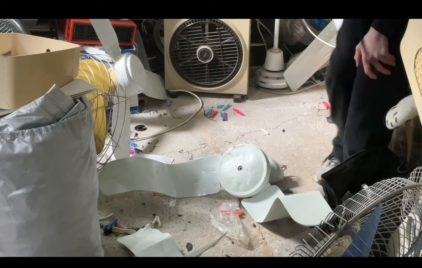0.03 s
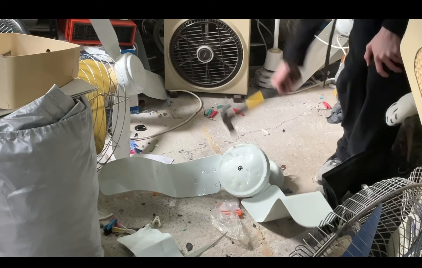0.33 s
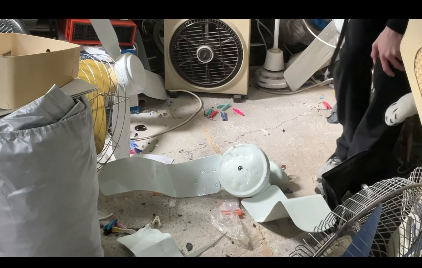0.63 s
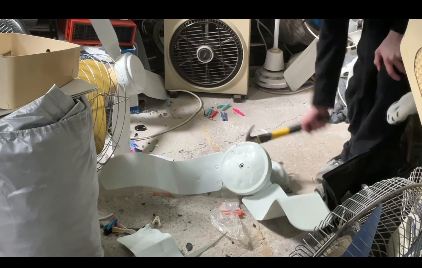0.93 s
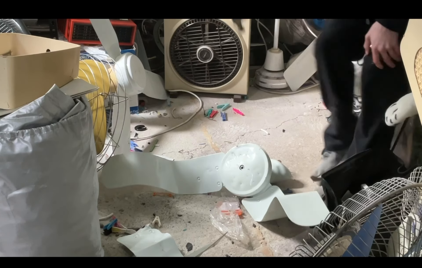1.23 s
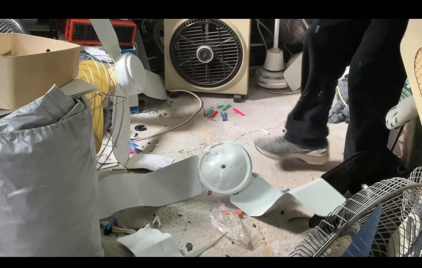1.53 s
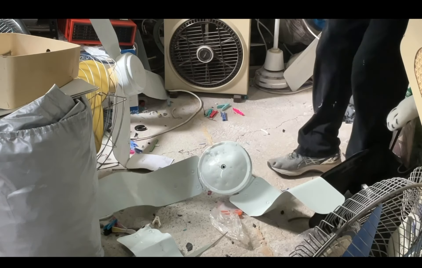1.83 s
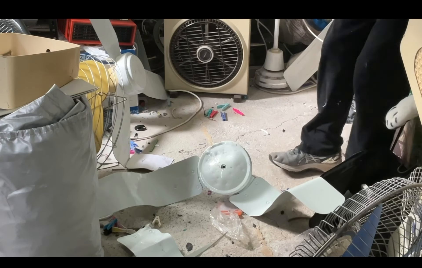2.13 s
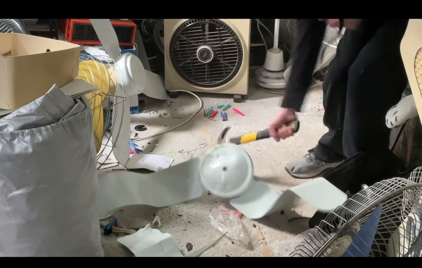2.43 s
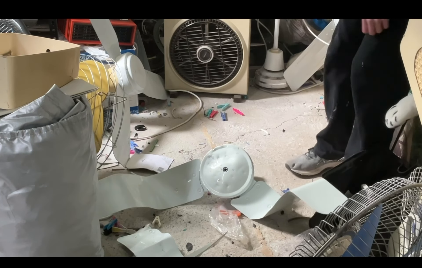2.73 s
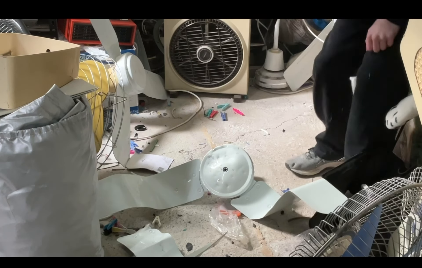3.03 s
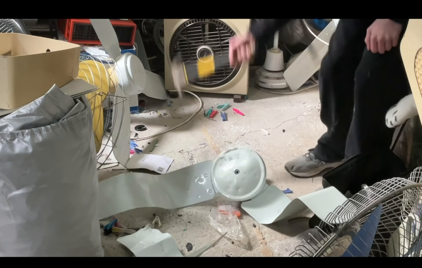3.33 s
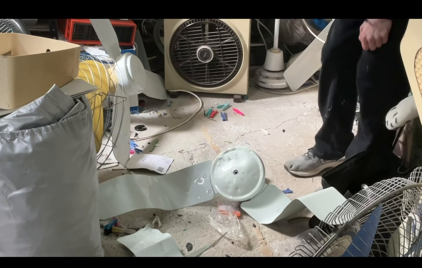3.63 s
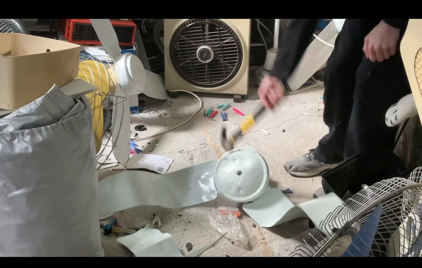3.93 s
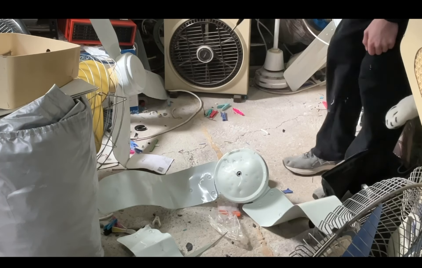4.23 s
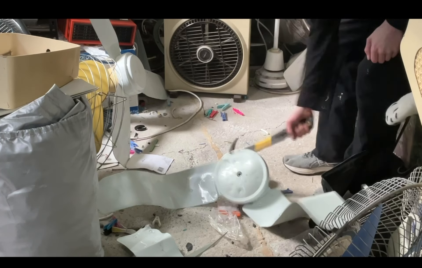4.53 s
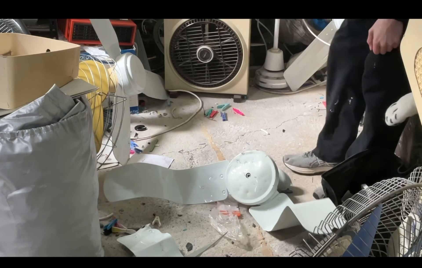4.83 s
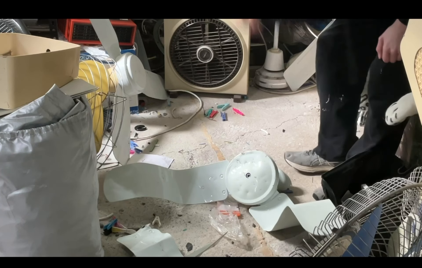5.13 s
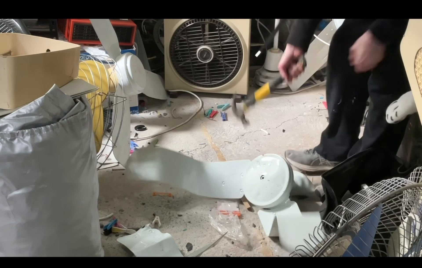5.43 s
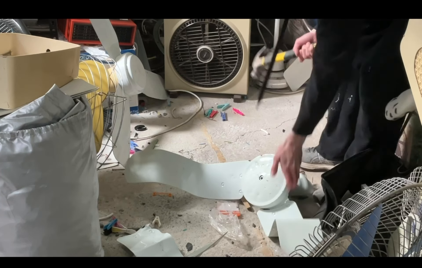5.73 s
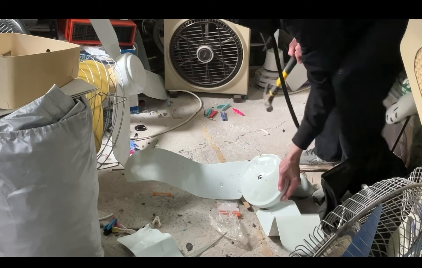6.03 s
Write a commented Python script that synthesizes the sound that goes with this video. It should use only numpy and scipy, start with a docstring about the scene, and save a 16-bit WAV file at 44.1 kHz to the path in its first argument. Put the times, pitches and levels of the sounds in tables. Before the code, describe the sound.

A hammer smashes a ceiling fan's metal housing on a concrete floor, close by in a small shed. Loud blows land at about 0.2 and 0.9 seconds, each a sharp crack with a brief, crumpled metallic clang and short, hard echoes. At 1.4 seconds a shoe kicks the fan, lighter and brighter, and it skids in a quick run of knocks before dropping with a dull clunk at 1.6. Five more blows follow at 2.4, 3.2, 3.9, 4.6 and 5.2 seconds, each slightly different in pitch. The fan hops and clatters on the floor after most of them, hardest just after 4.6. A loose steel part tinks, most clearly at 0.3 and 3.5 seconds. Small dry ticks and faint gritty shoe scuffs fall between the hits. A very faint low hum throbs throughout, and around 6 seconds the fan gives a soft, brief scrape.

```python
"""Smashing a fan in a shed

A claw hammer smashes a ceiling fan that lies on the concrete floor of a small cluttered shed.
Each blow cracks, rings the motor housing and shakes loose parts; the fan is kicked once, skids and
rocks back. A loose steel part tinks, shoes scuff the grit, and a low hum throbs under short,
hard echoes."""
import sys
import numpy as np
from scipy import signal
from scipy.fft import rfft, irfft, next_fast_len
from scipy.io import wavfile

SR = 44100
rng = np.random.default_rng(int(sys.argv[2]) if len(sys.argv) > 2 else 0)


def dump(signal):
    """Clip the signal to [-1, 1] and save it as 16-bit WAV at the path in sys.argv[1]."""
    limited = np.clip(np.atleast_2d(signal).T, -1, 1)
    pcm = np.round(limited * 32767).astype(np.int16)
    wavfile.write(sys.argv[1], SR, pcm)


N = 268701
SIZE = 32768  # samples in a one-shot
T, HZ = np.arange(SIZE) / SR, np.arange(SIZE // 2 + 1) * SR / SIZE
MIDDLE_S = T[SIZE // 2]


def amp(db):
    """Decibels to gain."""
    return 10 ** (np.asarray(db) / 20)


def curve(points, hz):
    """Read breakpoints of (frequency, value) on a log-frequency axis."""
    freqs, values = np.transpose(points)
    return np.interp(np.log(hz + 1e-3), np.log(freqs), values)


def unit(x):
    """Scale to energy 1."""
    return x / np.sqrt(np.sum(x ** 2))


def eq(x, db):
    """Minimum-phase EQ with the given dB at each frequency: no ring ahead of the attack."""
    cepstrum = irfft(db * np.log(10) / 20)
    cepstrum[1:SIZE // 2] *= 2
    cepstrum[SIZE // 2 + 1:] = 0
    return irfft(rfft(x) * np.exp(rfft(cepstrum)))


def add(track, s, x):
    """Mix x into the track at time s."""
    start = int(s * SR)
    x = x[max(-start, 0):max(len(track) - start, 0)]
    start = max(start, 0)
    track[start:start + len(x)] += x


# air noise: (frequency [Hz], relative level [dB])
AIR_SPECTRUM = [(20, -27.5), (45, 0), (65, 4.5), (100, -16), (140, -14), (280, -13.5), (600, -22),
                (2000, -28), (5000, -33.5), (9000, -41.5), (15000, -52.5)]
# hum tones: (frequency [Hz], rms level before the swell [dB])
HUM_TONES = [(59.2, -65.5), (77.5, -69.5), (143, -79.5)]
# the hum's swell: (time [s], gain [dB])
HUM_FADER = [(0, -2), (.7, 1.5), (2, -2.5), (3.1, -1.5), (3.8, 2), (4.5, 6), (5.1, 0.5), (6, 0)]

def room_tone():
    """The bed: low tones waver and beat against each other over faint air noise."""
    t = np.arange(N) / SR
    air = irfft(rfft(rng.standard_normal(N)) * amp(curve(AIR_SPECTRUM, np.fft.rfftfreq(N, 1 / SR))), N)
    hum = 0
    for hz, db in HUM_TONES:
        drift = np.interp(t, np.linspace(0, t[-1], 40), np.cumsum(rng.standard_normal(40)))
        hum += amp(db) * np.sqrt(2) * np.sin(2 * np.pi * hz * t + .33 * drift)
    swell = amp(np.interp(t, *np.transpose(HUM_FADER)))
    return amp(-65) * unit(air) * np.sqrt(N) + hum * swell


# tone of a hard contact on metal or concrete: (frequency [Hz], level [dB])
CONTACT_SPECTRUM = [(35, -24.5), (70, -6), (120, -7), (180, -1), (300, 1), (650, 8), (1200, 5.5), (1700, 3),
                    (2500, 5), (4200, -0.5), (7000, -3), (10000, -8.5), (15500, -14)]

def contact_tone(bass_db, treble_db):
    """The contact's EQ curve in dB, with a low and a high shelf."""
    low_shelf = bass_db * curve([(130, 1), (400, 0)], HZ)
    high_shelf = treble_db * curve([(1300, 0), (4000, 1)], HZ)
    return curve(CONTACT_SPECTRUM, HZ) + low_shelf + high_shelf


def grains(envelope, per_s, scatter_db):
    """Many tiny contacts of uneven size."""
    sizes = amp(scatter_db * np.minimum(rng.exponential(size=SIZE), 4)) * rng.choice([-1, 1], SIZE)
    touches = rng.random(SIZE) < per_s / SR
    return unit(envelope * sizes * touches + 1e-12)


def crunch(rise_s, fall_s, bass_db, treble_db):
    """A grainy burst, swelling to a peak at MIDDLE_S and dying away."""
    t = T - MIDDLE_S
    envelope = np.exp(np.minimum(t / rise_s, -t / fall_s))
    burst = grains(envelope, per_s=5000, scatter_db=1.2)
    return eq(burst, contact_tone(bass_db, treble_db)) * np.sqrt(np.sum(envelope ** 2))


# shoe scuffs: (peak time [s], level [dB], fall [s])
SCUFF_CUES = [(0, -49, .046), (.788, -60.5, .06), (1.142, -63, .2), (1.851, -61, .09), (2.259, -57, .047),
              (2.759, -58.5, .12), (4.32, -59, .025)]

def shoes():
    """Soles shuffle on the grit between blows."""
    out = np.zeros(N)
    for s, db, fall_s in SCUFF_CUES:
        add(out, s - MIDDLE_S, amp(db) * crunch(rise_s=.035, fall_s=fall_s, bass_db=6, treble_db=-2.5))
    return out


# reverb time: (frequency [Hz], t60 [s])
SHED_DECAY = [(100, 0.56), (300, 0.37), (700, 0.24), (1500, 0.58), (4000, 0.17), (8000, 0.47),
              (15000, 0.29)]
# reverb width: (frequency [Hz], side share of the power [0-1])
SHED_WIDTH = [(150, .01), (300, .12), (550, .45), (1200, .3), (1900, .08), (2550, .02), (4100, .01),
              (7000, .07), (9800, .01), (13000, .05)]

def shed(x):
    """Stereo reverb: near walls slap back after a short gap, then the echoes fade."""
    centres = np.geomspace(60, 16000, 7)
    noise = rfft(rng.standard_normal((2, SIZE)))
    tail = 0
    for centre, weights in zip(centres, np.eye(len(centres))):
        band = irfft(noise * curve(np.c_[centres, weights], HZ))
        tail += band * amp(-60 * T / curve(SHED_DECAY, centre))
    build_up = .25 + .75 / (1 + np.exp((.0125 - T) / .002))
    near_walls = 1 + 1.8 * np.exp(-T / .01)
    tail = unit(tail * build_up * near_walls) * np.sqrt(2)
    width = np.clip(curve(SHED_WIDTH, HZ), 0, .5)
    mid, side = irfft(rfft(tail) * np.sqrt([1 - width, width])) * (T < T[-1] * .9)
    return signal.fftconvolve(x[None], np.array([mid + side, mid - side]), axes=1)[:, :len(x)]


def crack(spread_s):
    """The transient: bending waves leave the sheet at a different moment in every band."""
    delay = np.interp(HZ, np.linspace(0, SR / 2, 160), spread_s * rng.random(160))
    return irfft(np.exp(-2j * np.pi * np.cumsum(delay) * HZ[1])) * (T < 2 * spread_s)


def ring(modes, push):
    """Damped modes driven by a push; each contact point weights and detunes them a little."""
    hz, db, t60 = np.transpose(modes)[:, :, None]
    weight, detune, phase = rng.standard_normal((3, len(hz), 1))
    waves = np.sin(2 * np.pi * (hz * (1 + .0018 * detune) * T + phase)) * amp(-60 * T / t60)
    response = sum(gain * unit(wave) for gain, wave in zip(amp(db + 2.2 * weight), waves))
    return signal.fftconvolve(push, response)[:SIZE]


# modes of the motor housing and blades: (frequency [Hz], level [dB], t60 [s])
HOUSING_MODES = [(118, -10.5, 0.17), (293.8, -8, .5), (392.6, -9.5, 0.49), (492.4, -9.5, .45),
                 (547, -4.5, 0.13), (584, -6.5, 0.12), (665, -1, 0.3), (726, -8, 0.45), (907.6, 0, 0.12),
                 (1098, -11.5, 0.66), (1250, -1.5, 0.36), (1372, 0, 0.17), (1863, -4, .2),
                 (3350, -11.5, .3), (4040, -11, 0.24), (4374, -9.5, .25), (5001, -12.5, 0.098),
                 (6050, -13, .3), (5900, -22, 0.34)]

def housing(push, tone_db, ring_db):
    """The fan's clang: short, crowded modes of crumpled sheet ripple the tone, and the body rings on."""
    ripple = np.interp(HZ, np.linspace(0, SR / 2, 256), rng.uniform(-1, 1, 256))
    depth_db = np.interp(HZ, [600, 2500], [1, 5])
    return eq(push, tone_db + ripple * depth_db) + amp(ring_db) * ring(HOUSING_MODES, push)


# EQ that makes the dry hit fuller than its echoes: (frequency [Hz], gain [dB])
DIRECT_EQ = [(120, 0), (450, 1.5), (1500, 2), (5000, 1), (13000, -1)]

def strike(bass_db, treble_db, note1_hz, note2_hz, note1_db, reverb_db):
    """The housing buckles with two panel notes; the fan jumps, so each hit has its own echoes."""
    snap = crack(spread_s=.005)
    chatter = grains((1 - np.exp(-T / .004)) * np.exp(-T / .0093), per_s=2500, scatter_db=1.1)
    tone_db = contact_tone(bass_db, treble_db)
    for note_hz, boost_db in [(note1_hz, note1_db), (note2_hz, 4.5)]:
        half_width_hz = 30 + .047 * note_hz
        tone_db += boost_db / (1 + ((HZ - note_hz) / half_width_hz) ** 2)
    hit = housing(snap + amp(-10) * chatter, tone_db, ring_db=-21)
    return eq(hit, curve(DIRECT_EQ, HZ)) + amp(reverb_db) * shed(hit)


def knock(bass_db, treble_db, chatter_db):
    """The fan hits the concrete with a crack and a skitter."""
    snap = crack(spread_s=.006)
    chatter = grains(np.exp(-T / .017), per_s=1800, scatter_db=1.5)
    return housing(snap + amp(chatter_db) * chatter, contact_tone(bass_db, treble_db), ring_db=-18.5)


# hammer blows: (time [s], level [dB], bass [dB], treble [dB], panel note 1 [Hz], panel note 2 [Hz],
# note 1 boost [dB], floor slam relative to the blow [dB])
BLOW_CUES = [(0.1886, 9.5, -4, 1.5, 770, 1500, 3, -14), (0.8948, 10.3, 4, 1, 793, 1820, 10, 1),
             (2.4499, 11.5, -2, 1, 643, 1400, 9, -8), (3.2022, 12, -6, 1.5, 560, 1960, 3.5, -20),
             (3.8818, 10, -7, 1.5, 522, 1080, 4, -2), (4.5615, 8.3, 5, 4, 593, 5150, 1.5, -18),
             (5.2354, 9.3, 0, 1, 297.5, 4600, 5, 0)]

def hammer():
    """The hero hits: steel comes down on the housing, in stereo with reverb."""
    out = np.zeros((2, N))
    for s, db, *shape, _ in BLOW_CUES:
        for channel, hit in zip(out, strike(*shape, reverb_db=4.3)):
            add(channel, s, amp(db) * hit)
    return out


def slams(delay_s=.018):
    """Each blow drives the housing against the concrete a moment later."""
    out = np.zeros(N)
    for s, db, *_, slam_db in BLOW_CUES:
        add(out, s + delay_s, amp(db + slam_db) * knock(bass_db=-2, treble_db=-4, chatter_db=-6))
    return out


# modes of the loose steel part: (frequency [Hz], level [dB], t60 [s])
STEEL_MODES = [(1832, -1, .25), (1925, -6, .2), (2110, -8, .3), (2620, -13, .2), (3413, -12, .3),
               (3560, -8, .15), (3640, -7, .22), (4156, -12, .18), (4409, -5, .17), (6132, -14, .2)]
# its tinks: (time [s], level [dB], treble [dB])
TINK_CUES = [(.315, -18, -12.5), (.587, -36, -11), (1.274, -35, -6), (2.84, -41, -3), (3.486, -18.5, -6),
             (3.722, -31.5, -6.5)]

def tinks():
    """Light touches on ringing steel; the loose part keeps rocking, so its ring flutters."""
    out = np.zeros(N)
    for s, db, treble_db in TINK_CUES:
        push = crack(spread_s=.0027) + amp(2) * grains(np.exp(-T / .035), per_s=900, scatter_db=2)
        flutter_db = np.interp(T, np.linspace(0, T[-1], 90), 4 * rng.standard_normal(90))
        metal = ring(STEEL_MODES, push) * amp(flutter_db) + amp(-13) * push
        add(out, s, amp(db) * eq(metal, curve([(2100, 0), (3600, treble_db)], HZ)))
    return out


# short ticks: (time [s], level [dB], fall [s], bass [dB], treble [dB])
TICK_CUES = [(.5435, -36, .004, 8, -19), (1.274, -49, .008, 0, -10), (1.346, -38, .006, -2, 14),
             (3.7245, -36.5, .013, 0, -16), (5.841, -57.5, .015, -20, 10.5)]

def ticks(rise_s=.0015):
    """Short dry ticks, dull or bright, some with the steel tinks or just before the kick."""
    out = np.zeros(N)
    for s, db, *shape in TICK_CUES:
        add(out, s - MIDDLE_S, amp(db) * crunch(rise_s, *shape))
    return out


# landings, flat or skittering: (time [s], level [dB], treble [dB], chatter [dB])
LANDING_CUES = [(.985, -8, 5, -2), (1.6235, -9.5, -17, -10), (3.295, -10.5, -10, 2), (3.394, -19, -8, 12),
                (4.025, -17, 8, 7), (4.6325, 4.5, 1, -8), (4.775, -20, 3, 2), (5.343, -8.5, 3, 3),
                (5.468, -14.5, -8, 8)]

def landings(hop_s=.024, hop_shrink=.7, hop_loss_db=11, bass_db=5):
    """The fan drops on its rim (dull) or a blade (bright) and settles in shorter, weaker hops."""
    out = np.zeros(N)
    for s, db, treble_db, chatter_db in LANDING_CUES:
        for hop in range(3):
            add(out, s, amp(db - hop * hop_loss_db) * knock(bass_db, treble_db, chatter_db))
            s += hop_s * hop_shrink ** hop
    return out


def kick(at_s=1.3556):
    """A shoe hits the housing: lighter, brighter and wetter than the hammer."""
    out = np.zeros((2, N))
    pair = strike(bass_db=0, treble_db=7.5, note1_hz=673, note2_hz=2540, note1_db=5, reverb_db=8)
    for channel, hit in zip(out, pair):
        add(channel, at_s, hit)
    return out


def skid(start_s=1.402, gap_s=.026, jitter_s=.003):
    """The kicked fan's rim catches at uneven intervals; as it slows, the knocks weaken and deepen."""
    out = np.zeros(N)
    for k in range(6):
        s = k * gap_s + min(k, 1) * jitter_s * rng.standard_normal()
        catch = knock(bass_db=-7 + 150 * s, treble_db=3 - 55 * s, chatter_db=3)
        add(out, start_s + s, amp(3 - 100 * s) * catch)
    return out


def drag(peak_s=6.088):
    """A hand starts to drag the fan round over the grit."""
    out = np.zeros(N)
    add(out, peak_s - MIDDLE_S, amp(-41) * crunch(rise_s=.034, fall_s=.02, bass_db=18, treble_db=9))
    return out


def scene():
    """The mix: small sounds share one reverb; the hammer and the kick bring their own."""
    foley = slams() + skid() + landings() + tinks() + shoes() + ticks() + drag()
    return foley + amp(1) * shed(foley) + room_tone() + hammer() + kick()


# stereo phase: (frequency [Hz], lag of the left channel [rad])
STEREO_LAG = [(0, 0), (1200, 0), (2250, 2.25), (2550, np.pi), (3200, 5.4), (3800, 6.15), (4700, 6.45),
              (7000, 7.7), (9000, 9.2), (10900, 9.7), (13600, 12.4), (16000, 12.7)]
# stereo balance: (frequency [Hz], left minus right [dB])
STEREO_BALANCE = [(200, 0), (400, 2), (600, 3.5), (850, 0), (1200, -3.5), (2000, 0)]

def record(dry):
    """The stereo pair shifts phase and balance by frequency, rounds the peaks and cuts the top."""
    size = next_fast_len(N + SIZE)
    hz = np.arange(size // 2 + 1) * SR / size
    lag = np.interp(hz, *np.transpose(STEREO_LAG))
    left = amp(curve(STEREO_BALANCE, hz) / 2) * np.exp(-.5j * lag)
    pair = irfft(rfft(dry, size) * np.array([left, 1 / left]), size)[:, :N]
    high_cut = signal.ellip(10, .2, 70, 15800, fs=SR, output="sos")
    return signal.sosfilt(high_cut, np.tanh(1.1 * pair) / 1.1)


dry = scene()
out = record(dry)
dump(out)
```